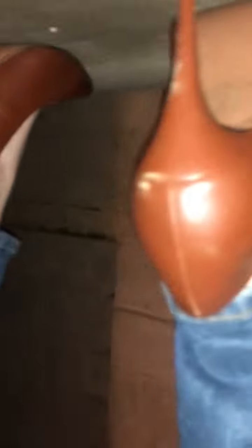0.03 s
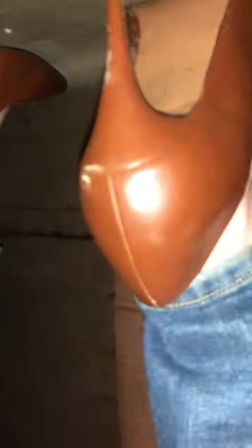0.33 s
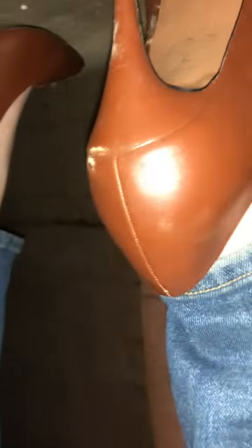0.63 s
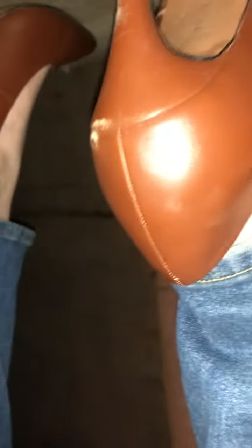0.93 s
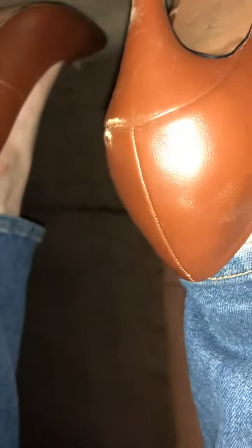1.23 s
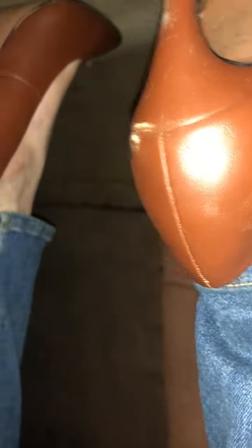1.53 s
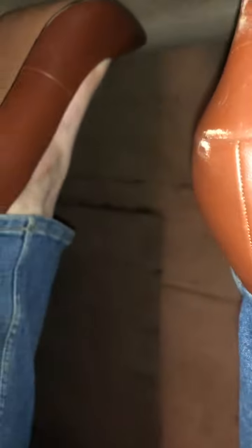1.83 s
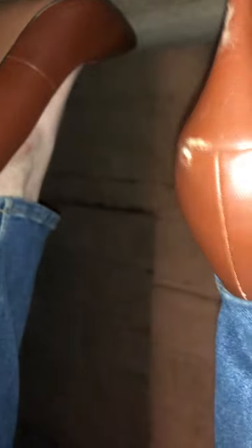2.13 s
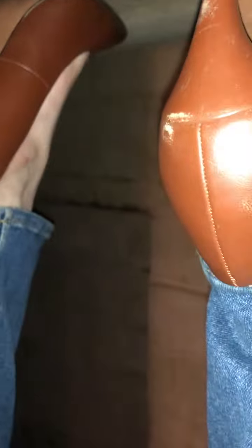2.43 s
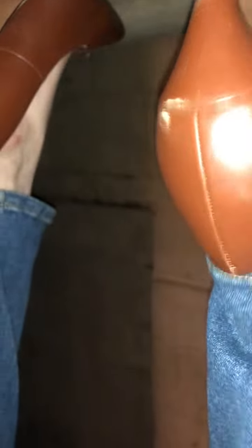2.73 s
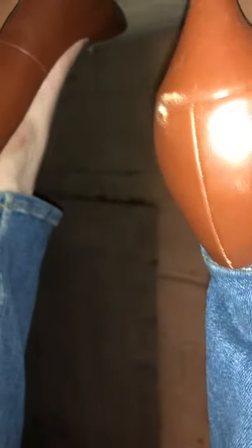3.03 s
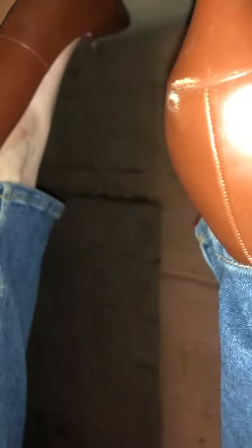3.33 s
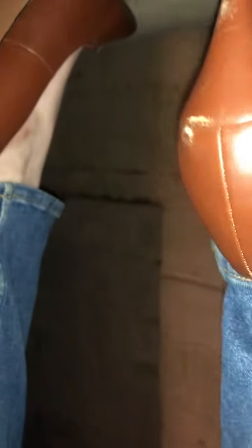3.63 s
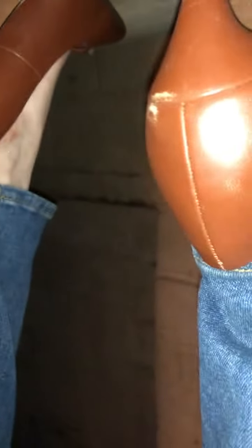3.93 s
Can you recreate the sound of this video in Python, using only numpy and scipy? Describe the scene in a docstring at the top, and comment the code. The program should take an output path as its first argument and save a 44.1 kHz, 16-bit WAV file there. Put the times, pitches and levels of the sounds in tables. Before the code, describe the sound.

High heels scuff, then tap in turn on gritty concrete over a low rumble.

```python
"""Two high-heeled shoes on a gritty concrete step, one microphone close by, a low rumble behind. First a heel
drags twice and grit snaps under it; in the second drag the sole flops down. At one second comes a faint tap,
and a deep drone joins the rumble. From two seconds on the heels tap in turn, one duller, one brighter, each
with its own ring, and the step answers both with hollow tones. Grit ticks between the knocks, and the step and
walls throw back a short tail."""
import sys
import numpy as np
from scipy import signal
from scipy.fft import rfft, irfft
from scipy.io import wavfile

SR = 44100
rng = np.random.default_rng(int(sys.argv[2]) if len(sys.argv) > 2 else 0)


def master(y):
    """Save y as 16-bit WAV."""
    cut = np.clip(np.atleast_2d(y).T, -1, 1)
    pcm = np.round(cut * 32767)  # scale
    wavfile.write(sys.argv[1], SR, pcm.astype(np.int16))


N = 176400
T = np.arange(N) / SR
AGE = T[:SR // 2]  # time since an event began, s

# spectrum of cracking grit: f/Hz, relative level/dB
CRACK_SPECTRUM = [(800, 9), (2500, 10.5), (5000, -1), (9000, -8.5), (12000, -18), (16000, -39)]
# hollow tones of the step, struck by both shoes: f/Hz
HOLLOW_HZ = [586, 743, 1039, 1179, 1725, 2138]
# a row for each of those tones: t60/s, level/dB when the brighter shoe strikes, level/dB when the duller shoe
# strikes
HOLLOW_RING = [(.10, -30.5, -20), (0.098, -18.5, -12.5), (0.136, -28, -16.5), (.15, -30, -29),
               (.125, -30.5, -32), (.14, -54, -84)]


def from_db(db):
    """Decibels to gain."""
    return 10 ** (np.asarray(db) / 20)


def rms_one(x):
    """Scale to unit rms."""
    return x / np.sqrt(np.mean(x ** 2) + 1e-20)


def at_hz(points, hz):
    """Read a table on a log-frequency axis."""
    freqs, values = np.transpose(points)
    return np.interp(np.log(np.maximum(hz, 1)), np.log(freqs), values)


def fader(points):
    """Gain over the scene from rows of t/s, level/dB."""
    return from_db(np.interp(T, *np.transpose(points)))


def dying(t60):
    """Exponential decay, 60 dB down after t60 seconds."""
    return np.exp(-np.log(1000) * AGE / t60)


def damped_tone(hz, db, t60):
    """One struck mode ringing out."""
    return from_db(db) * np.sin(2 * np.pi * hz * AGE) * dying(t60)


def butter(x, hz, kind):
    """Second-order Butterworth filter."""
    return signal.sosfilt(signal.butter(2, hz, kind, fs=SR, output="sos"), x + 1e-18)


def colour(x, spectrum):
    """Minimum-phase filter of the given spectrum that keeps the power of white noise."""
    size = 8192
    gain = from_db(at_hz(spectrum, np.fft.rfftfreq(size, 1 / SR)))
    cepstrum = irfft(np.log(gain))
    cepstrum[1:size // 2] *= 2
    cepstrum[size // 2 + 1:] = 0
    response = irfft(np.exp(rfft(cepstrum)))
    return signal.fftconvolve(x, response / np.linalg.norm(response))[:len(x)]


def add(track, s, sound):
    """Mix a sound in at s seconds."""
    start = int(s * SR)
    track[start:start + len(sound)] += sound[:N - start]


def grains(per_s, size=N):
    """Random clicks of uneven strength, rms 1."""
    strength_db = 6.5 * np.minimum(rng.exponential(1, size), np.pi)
    clicks = from_db(strength_db) * rng.choice([-1, 1], size)
    return rms_one(clicks * (rng.random(size) < per_s / SR))


def burst(t60):
    """A dying puff of noise whose energy is set by its decay time."""
    shape = dying(t60)
    return rms_one(rng.standard_normal(len(AGE)) * shape) * np.sqrt(np.mean(shape ** 2))


def background():
    """The ambience: low rumble, a deep drone that sets in after a second, and faint air."""
    # spectra of the three noises: f/Hz, relative level/dB
    rumble_spectrum = [(15, -60), (25, -32), (45, -20), (70, -5.5), (125, -13), (165, -5), (210, -1),
                       (255, 0.5), (325, -11), (372, -4.5), (440, -19.5), (520, -22), (700, -39.5),
                       (1300, -45.5), (5000, -93)]
    drone_spectrum = [(15, -55), (25, -28), (45, -11), (60, -7), (72, 1), (84, -2), (105, -2), (140, -8),
                      (250, -14), (400, -35), (2000, -90)]
    air_spectrum = [(300, 3), (1200, 1), (2300, -9.5), (5000, -9.5), (9500, -14), (12000, -20.5),
                    (14000, -18), (16000, -37)]
    # entry of the drone: t/s, level/dB
    drone_level = [(1.03, -73), (1.09, -48.5), (4, -45.5)]
    rumble, drone, air = (colour(rng.standard_normal(N + SR), spectrum)[SR:]
                          for spectrum in (rumble_spectrum, drone_spectrum, air_spectrum))
    return from_db(-47.5) * rumble + fader(drone_level) * drone + from_db(-66.5) * air


def reflections(direct, delay_s=0.0025):
    """Step and walls return a short diffuse tail to the microphone, dying band by band."""
    # strength of the tail: f/Hz, level/dB
    tail_spectrum = [(60, 8), (130, -22), (300, -18.5), (700, -17.5), (1500, -15.5), (3000, -21.5),
                     (7000, -11), (14000, -41.5)]
    # its decay: f/Hz, t60/s
    tail_t60 = [(100, 0.62), (400, 0.11), (1000, 0.24), (3000, 0.21), (8000, 0.16), (14000, .16)]
    edges_hz = np.geomspace(45, 17000, 14)
    tail = 0
    for low, high in zip(edges_hz, edges_hz[1:]):
        hz = np.sqrt(low * high)
        band = butter(rng.standard_normal(len(AGE)), [low, high], "band") * dying(at_hz(tail_t60, hz))
        band *= np.sqrt(2 * (high - low) / SR) / np.linalg.norm(band)  # energy in step with bandwidth
        tail = tail + from_db(at_hz(tail_spectrum, hz)) * band
    out = np.zeros(N)
    add(out, delay_s, signal.fftconvolve(direct, tail))
    return out


def grit_crackle():
    """Loose grit crackles faintly while the feet shift."""
    # course of the crackle: t/s, level/dB
    crackle_level = [(1.8, -102), (1.95, -65.5), (2.87, -74), (2.95, -74.5), (3.05, -78.5), (3.85, -67),
                     (4, -85.5)]
    return colour(grains(per_s=85) * fader(crackle_level), CRACK_SPECTRUM)


def grit_ticks():
    """Single grains snap under a shoe, each with a broad pitch of its own."""
    # snapping grains: t/s, level/dB, centre f/Hz
    ticks = [(0.0712, -33.5, 8300), (0.133, -26, 6760), (0.1623, -28, 8500), (0.1701, -24.5, 4480),
             (0.2018, -16.5, 5040), (.2700, -12.5, 7200), (.2848, -29, 6000), (0.3808, -38, 6500),
             (0.4663, -30.5, 6800), (0.483, -17.5, 6940), (0.5144, -26.5, 6900), (0.5584, -13.5, 7350),
             (.5690, -29, 8000), (0.604, -24.5, 6200), (0.659, -7.5, 5400), (0.6621, -14.5, 5960),
             (.6950, -25.5, 7340), (0.7186, -27, 4200), (.8240, -40, 3460), (0.924, -47, 6000),
             (0.9906, -31, 5170), (1.0225, -41.5, 4940), (1.0925, -44, 7000), (1.3714, -32, 6100),
             (1.409, -39, 6900), (1.4156, -28, 6700), (1.9005, -43, 7000), (1.9088, -37.5, 7340),
             (1.9690, -53, 7800), (2.117, -30.5, 6300), (2.2356, -29, 8100), (2.2796, -22, 4630),
             (2.4735, -37, 5030), (2.5434, -22, 6230), (2.6120, -28.5, 8800), (2.645, -41, 6750),
             (2.725, -41, 4420), (2.8493, -38, 6970), (3.06, -28.5, 7500), (3.1725, -40.5, 7000),
             (3.2752, -38, 5900), (3.4470, -23.5, 8500), (3.4509, -26.5, 7400), (3.4637, -32, 7500),
             (3.5893, -27.5, 8250), (3.781, -27, 7000), (3.8660, -47, 7000)]
    out = np.zeros(N)
    for s, db, hz in ticks:
        resonance = signal.iirpeak(hz, Q=1.06, fs=SR)
        add(out, s, from_db(db) * signal.lfilter(*resonance, burst(t60=0.0047) + 1e-18))
    return butter(out, 10200, "low")


def sole_roll(taps, lead_s=0.024, t60=0.58):
    """Sand rasps under the sole as it rolls down, swelling just before each tap and dying after it."""
    # spectrum of the rasp: f/Hz, relative level/dB
    rasp_spectrum = [(1200, 5), (3000, -2.5), (6000, -7.5), (9500, -7.5), (12000, -16.5), (16000, -35)]
    pressure = 0
    for s, db, *_ in taps:
        gap_s = abs(T - s)
        swell = np.where(T < s, np.exp(-gap_s / lead_s), from_db(-60 * gap_s / t60))
        pressure = pressure + np.sqrt(from_db(db)) * swell
    return from_db(-53) * colour(pressure * grains(per_s=3200), rasp_spectrum)


def sole_flops():
    """The sole flops down in soft, hollow knocks, one damped tone each."""
    # knocks of the sole: t/s, level/dB, f/Hz, t60/s
    flops = [(.5500, -16.5, 800, 0.025), (.5600, -18, 501, 0.047)]
    out = np.zeros(N)
    for s, db, hz, t60 in flops:
        add(out, s, damped_tone(hz, db, t60))
    return out


def heel_scuffs():
    """Drags and brushes: dense tiny slips hiss at the heel tip and shake the body of the shoe."""
    # one list for each drag: t/s, hiss level/dB, rub level/dB
    drags = [
        [(.125, -56, -72), (.182, -57, -48.5), (.195, -43.5, -36.5), (.22, -40.5, -36), (.247, -31, -35.5),
         (.262, -43.5, -40.5), (.295, -55, -51)],
        [(.55, -52, -39), (.565, -36, -21), (.585, -46, -42), (.60, -58, -50), (.624, -49, -52),
         (.64, -79, -67), (.668, -45.5, -56), (.69, -54.5, -75), (.73, -56.5, -63)],
    ]
    # light brushes of the tip: t/s, hiss level/dB, rub level/dB, t60/s
    brushes = [(0.479, -47, -44, 0.066), (0.5469, -32, -27, 0.032), (0.563, -27, -15, 0.0053),
               (0.6431, -35, -33, 0.032), (1.9644, -38, -29, 0.043), (1.978, -46, -36, 0.065),
               (2.0490, -61, -36.5, 0.045), (2.119, -40.5, -35.5, 0.005), (2.2782, -31.5, -36.5, 0.011),
               (2.3402, -74, -43.5, 0.021), (2.6700, -73, -37.5, 0.0095), (3.0174, -37, -28.5, 0.016),
               (3.5592, -24.5, -24.5, 0.0086)]
    # spectra of the hissing grit and the rubbed shoe: f/Hz, relative level/dB
    hiss_spectrum = [(700, 3), (1500, 14), (3500, 13), (5500, 3), (8000, 9.5), (10500, 5), (13000, -9),
                     (16000, -63.5)]
    rub_spectrum = [(100, -23.5), (220, -8), (350, -5.5), (520, -2.5), (660, -8.5), (800, 3), (1050, -7.5),
                    (1500, -11), (2200, -17), (4000, -34.5)]
    hiss, rub = np.zeros((2, N))
    slips = grains(per_s=1000) + from_db(-5) * rng.standard_normal(N)  # coarse grains and smooth sand
    for drag in drags:
        s, hiss_db, rub_db = np.transpose(drag)
        touching = slips * (T > s[0]) * (T < s[-1])
        hiss += touching * from_db(np.interp(T, s, hiss_db))
        rub += touching * from_db(np.interp(T, s, rub_db))
    for s, hiss_db, rub_db, t60 in brushes:
        touch = burst(t60)
        add(hiss, s, from_db(hiss_db) * touch)
        add(rub, s, from_db(rub_db) * touch)
    return colour(hiss, hiss_spectrum) + colour(rub, rub_spectrum)


def sole_thump(first_hz, last_hz, sag_s=0.013, rise_s=0.0018):
    """The sole's thump sinks in pitch as the weight settles."""
    hz = last_hz + (first_hz - last_hz) * np.exp(-AGE / sag_s)
    attack = 1 - np.exp(-AGE / rise_s)
    return np.sin(2 * np.pi * np.cumsum(hz) / SR) * attack * dying(t60=0.071)


def heel_taps(modes, thump, taps):
    """Each tap rings the shoe and the step through a hard or soft contact, thumps the sole, cracks and crushes
    grit."""
    ring = butter(sum(damped_tone(*mode) for mode in modes), 274, "high")
    knocks, cracks = np.zeros((2, N))
    for s, db, contact_hz, crack_db, crunch_db, thump_db in taps:
        knock = from_db(db) * butter(ring, contact_hz, "low")
        add(knocks, s, knock + from_db(thump_db) * thump)
        step_echo = from_db(-17) * butter(knock, 1496, "low")
        add(knocks, s + 0.00662, step_echo)
        add(cracks, s - 0.0005, from_db(crack_db) * burst(t60=0.0075))
        crunch = grains(per_s=110, size=len(AGE)) * dying(t60=0.072)
        add(cracks, s, from_db(crunch_db) * crunch)
    return knocks + colour(cracks, CRACK_SPECTRUM)


def dull_shoe():
    """The duller shoe lands five times, ringing most strongly near 800 Hz."""
    # damped modes of the shoe: f/Hz, level/dB, t60/s
    body_modes = [(294, -11.5, 0.064), (463, -24.5, 0.18), (691, -13, 0.075), (791, -0.5, 0.044),
                  (892, -4, 0.031), (1212, -12.5, 0.055), (1483, -20.5, 0.025), (2900, -1, 0.0035),
                  (4020, -1.5, 0.0071)]
    # landings: t/s, ring level/dB, contact cutoff f/Hz, crack level/dB, crunch level/dB, thump level/dB
    taps = [(0.9789, -26, 1870, -29.5, -59, -25.5), (1.9930, -13.5, 2030, -24.5, -32, -16),
            (2.5156, -7.5, 2400, -18.5, -32, -9.5), (3.0756, -4, 930, -28, -54.5, -11),
            (3.582, -6, 1800, -20.5, -42, -10)]
    t60, hollow_db, _ = np.transpose(HOLLOW_RING)[[0, 2, 1]]
    modes = [*body_modes, *zip(HOLLOW_HZ, hollow_db, t60)]
    return heel_taps(modes, sole_thump(first_hz=240, last_hz=180), taps) + sole_roll(taps)


def bright_shoe():
    """The brighter shoe lands four times, harder, with a higher and shorter ring."""
    # damped modes of the shoe: f/Hz, level/dB, t60/s
    body_modes = [(259, -24, 0.021), (454, -46.5, 0.18), (849, -12, 0.0276), (1080, -3.5, 0.017),
                  (1398, -9, 0.0095), (2182, -1.5, 0.0049), (2396, -18.5, 0.013), (3350, -8, 0.013)]
    # landings: t/s, ring level/dB, contact cutoff f/Hz, crack level/dB, crunch level/dB, thump level/dB
    taps = [(2.2016, -1.5, 1970, -20.5, -47, -9), (2.7686, -1, 1910, -14, -40, -7),
            (3.2986, 2.5, 833, -17.5, -45, -7), (3.7712, -2.5, 4200, -8, -25, -10.5)]
    t60, hollow_db, _ = np.transpose(HOLLOW_RING)
    modes = [*body_modes, *zip(HOLLOW_HZ, hollow_db, t60)]
    return heel_taps(modes, sole_thump(first_hz=269.5, last_hz=191.6), taps) + sole_roll(taps)


def scene():
    """Both shoes close up, their reflections and the ambience behind, in mono."""
    shoes = bright_shoe() + dull_shoe() + heel_scuffs() + sole_flops() + grit_ticks() + grit_crackle()
    return (shoes + reflections(shoes) + background())[None]


def record(dry):
    """The recorder rounds the highest peaks and cuts the top, 70 dB down from 16.5 kHz."""
    rounded = dry / (1 + dry ** 6) ** (1 / 6)
    return signal.sosfilt(signal.cheby2(12, 70, 16500, fs=SR, output="sos"), rounded)


dry = scene()
out = record(dry)
master(out)
```